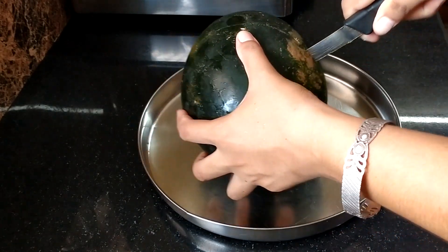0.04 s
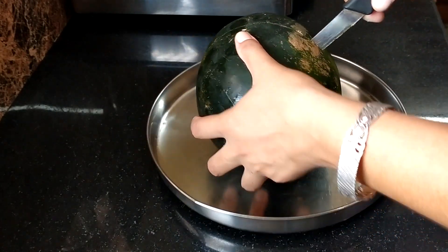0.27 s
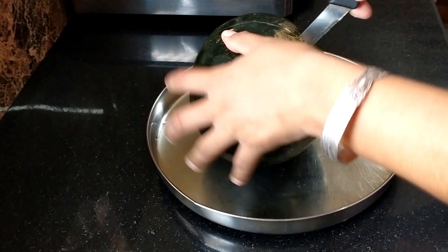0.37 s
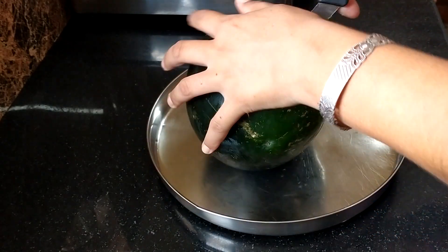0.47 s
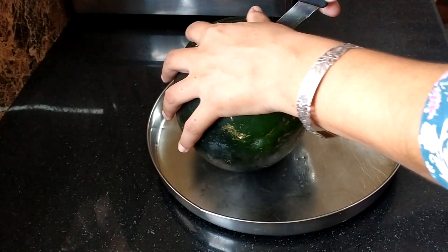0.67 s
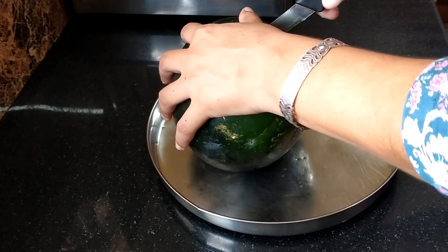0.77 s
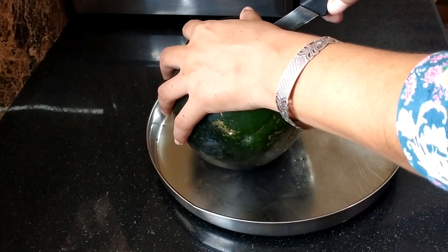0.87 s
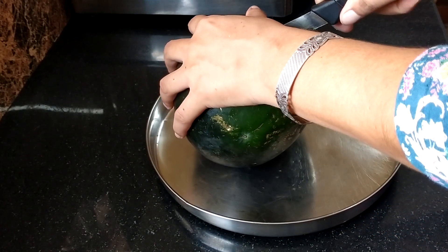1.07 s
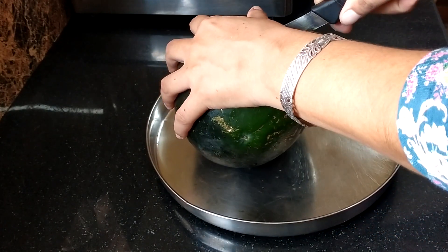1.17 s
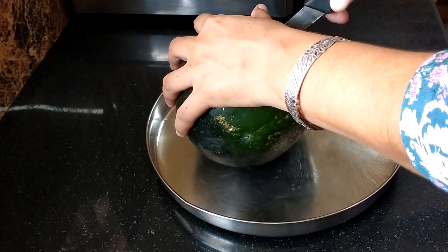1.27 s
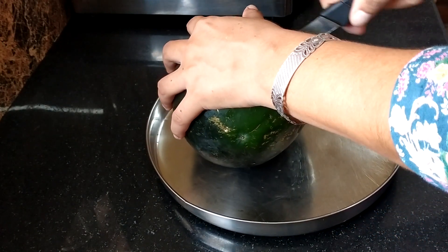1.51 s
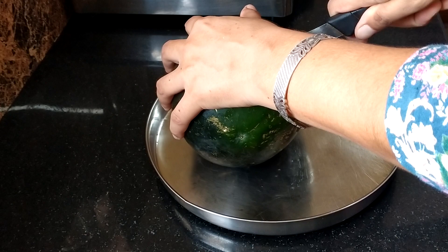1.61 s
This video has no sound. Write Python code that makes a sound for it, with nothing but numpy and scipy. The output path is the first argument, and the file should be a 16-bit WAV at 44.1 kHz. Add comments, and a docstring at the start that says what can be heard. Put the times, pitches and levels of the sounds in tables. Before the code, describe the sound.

Close by, a metal tray gives a quick run of ringing knocks under a turning watermelon. The melon settles with a dull thud and small ticks, over a faint hum in a hard, echoing kitchen.

```python
"""Watermelon in a steel tray

A watermelon is rolled over in a round steel tray on a stone counter, in a hard, echoing kitchen.
The tray tips and clatters, knocks once more with a thin ring of a knife blade, then ticks as the
melon settles. The rind murmurs and squeaks on the steel, the melon's weight thuds, and at the end
something rubs on the rind. A low, wavering drone fills the room throughout."""
import sys
import numpy as np
from scipy import signal
from scipy.fft import rfft, irfft
from scipy.io import wavfile
from scipy.ndimage import uniform_filter1d

SR = 44100
rng = np.random.default_rng(int(sys.argv[2]) if len(sys.argv) > 2 else 0)


def to_wav(s):
    """Save 16-bit WAV."""
    ch = np.atleast_2d(s).T  # columns
    pcm = np.round(np.clip(ch, -1, 1) * 32767)  # PCM
    wavfile.write(sys.argv[1], SR, pcm.astype(np.int16))


N = 72765
T = np.arange(N) / SR


# knocks of the tray under the melon (time [s], relative level [dB], treble [dB], chatter length [s])
TRAY_KNOCKS = [(.131, -29.5, -10, 0.007), (.1955, -22.5, 7, 0.0042), (.2395, -3, 4.5, .008),
               (.2565, -2.5, 2, 0.0093), (.279, -1, -4.5, .01), (.3825, -2.5, -6.5, .01),
               (.397, -5, -26, .012), (.465, -13, -8.5, .01), (.563, -20.5, 6.5, .008)]
# light ticks of rind and knife on the steel (time [s], relative level [dB], treble [dB])
STEEL_TICKS = [(0.1414, -32.5, 2), (0.4898, -26.5, 4.5), (.6466, -28, 14), (.6945, -32, 1),
               (0.7722, -27, -3), (0.8054, -24.5, 4.5), (1.0261, -40, 8), (1.0549, -32, 2),
               (1.2227, -36, -1), (1.2567, -39, -1), (1.3305, -46.5, 18), (1.5101, -50, 15),
               (1.528, -50, 16), (1.56, -42.5, 12)]
# pitches of the tray's clear modes (frequency [Hz])
MODE_PITCHES = [1018, 1117, 1158, 1190, 1234, 1374, 1775, 1847, 2137, 2185, 2652, 3724, 4037, 4946]
# how those modes ring, in the same order (relative level [dB], t60 [s])
MODE_RINGS = [(-3.5, 1.05), (2, 0.36), (-5, 1.15), (1.5, 0.6), (-1.5, 1.12), (-12, 2.02), (-6, 1.3),
              (0.5, 1.05), (-6, 0.48), (-9.5, 1.62), (-9, .6), (-7.5, 0.41), (-10.5, .7), (-11.5, 0.31)]

def tray(level_db=7, modes_db=-6, tick_chatter_s=.003):
    """Every knock and tick sets off a dense clang and feeds the steel's clear modes."""
    contacts = TRAY_KNOCKS + [(*tick, tick_chatter_s) for tick in STEEL_TICKS]
    pushes = sum(contact(*row) for row in contacts)
    clang = signal.fftconvolve(pushes, clang_response())[:N]
    touches = np.zeros(N)
    for start, db, _, length in contacts:
        touching = (T >= start) & (T < start + length)
        touches += undb(db) * unit_energy(1. * touching)
    modes = sum(undb(db) * ring(touches, hz, t60) for hz, (db, t60) in zip(MODE_PITCHES, MODE_RINGS))
    modes = unit_energy(modes) * np.linalg.norm(touches)
    return undb(level_db) * (clang + undb(modes_db) * modes)


def contact(start, db, treble_db, length, bounces=24, chatter_db=4):
    """A first hit followed by a quick chatter of small bounces."""
    push = signal.unit_impulse(N, int(start * SR))
    times = start + rng.random(bounces) * length
    sizes = undb(chatter_db) * unit_energy(rng.standard_normal(bounces))
    np.add.at(push, (times * SR).astype(int), sizes)
    return undb(db) * shelf(unit_energy(push), treble_db)


def ring(touches, hz, t60, beat_db=4.5):
    """One beating mode: every touch adds energy, which then leaks away."""
    retained = np.exp(-2 * np.log(1000) / (t60 * SR))
    energy = signal.lfilter([1], [1, -retained], touches ** 2)
    beating = undb(beat_db * walk(25.65))
    return np.sqrt(energy) * beating * np.sin(2 * np.pi * (hz * T + rng.random()))


# broad resonances of the tray's floor, damped by the melon (frequency [Hz], width [Hz], boost [dB])
FLOOR_RESONANCES = [(1158, 120, 6.5), (1865, 37, 9.5), (2678, 49, 7), (3730, 48, 6.5)]
# EQ of a knock and its echo (frequency [Hz], relative level [dB])
KNOCK_EQ = [(60, -13), (130, -29), (300, -15), (420, -19), (490, -7), (620, -10), (760, -7), (1180, -5),
            (1550, -7), (2100, -2), (2800, -7.5), (3500, -13), (5700, -19), (8000, -16), (9600, -24.5),
            (15500, -20.5)]

def clang_response(crack_db=-5, clang_db=-3, room_db=-2):
    """The answer to one push: a crack and a short, dense clang, then the kitchen's tail."""
    crack = unit_energy(rng.standard_normal(N) * fade(t60=.008))
    body = unit_energy(rng.standard_normal(N) * fade(t60=.09))
    clang = resonate(body + undb(crack_db) * crack, FLOOR_RESONANCES)
    tail = shelf(kitchen_tail(), treble_db=-3.5)
    return colour(undb(clang_db) * clang + undb(room_db) * tail, KNOCK_EQ)


# reverb time of the kitchen (frequency [Hz], t60 [s])
KITCHEN_DECAY = [(150, 1.16), (1000, 1.023), (2500, 0.93), (6000, 0.82), (15000, 0.51)]

def kitchen_tail(build_s=.0091):
    """Echoes off hard walls build into a wash whose treble dies first."""
    hz = np.fft.rfftfreq(N, 1 / SR)
    spectrum = rfft(rng.standard_normal(N))
    edges_hz = np.geomspace(40, SR / 2, 16)
    tail = np.zeros(N)
    for low, high in zip(edges_hz, edges_hz[1:]):
        band = irfft(spectrum * ((hz >= low) & (hz < high)), N)
        tail += band * fade(on_log_axis(np.sqrt(low * high), KITCHEN_DECAY))
    return unit_energy(tail * (1 - np.exp(-T / build_s)))


# modes of the knife blade (frequency [Hz], level [dB], t60 [s])
BLADE_MODES = [(6280, -46, 0.34), (8080, -49, 0.59), (15150, -45, .25)]

def blade(start_s=.387):
    """The knife blade rings thin and high as the tray knocks back."""
    touch = signal.unit_impulse(N, int(start_s * SR))
    return sum(undb(db) * ring(touch, hz, t60) for hz, db, t60 in BLADE_MODES)


# fader curve of the roll (time [s], level [dB])
ROLL_LEVEL = [(0, -52.5), (.11, -62), (.19, -52.5), (.232, -38), (.3, -41.5), (.45, -44), (.62, -50),
              (.9, -60), (1.08, -58), (1.4, -66), (1.65, -71)]
# EQ of rind rolling on steel (frequency [Hz], relative level [dB])
ROLL_EQ = [(200, 1.5), (500, -9), (900, -2), (1300, 1), (2100, 1), (3500, -10), (8000, -22), (15000, -30.5)]

def rolling(grain_db=2.5):
    """Tiny slips of the rind make a grainy murmur in the steel."""
    slips = rng.standard_normal(N) * undb(grain_db * rng.exponential(size=N))
    return unit(colour(slips, ROLL_EQ)) * fader(ROLL_LEVEL)


# dull thuds under the clatter (time [s], level [dB])
MELON_THUDS = [(0.274, -45), (.568, -32), (0.624, -38)]

def thuds(hz=100.5, t60=.19):
    """The melon's weight lands on the counter, each time a low, damped tone."""
    sound = np.zeros(N)
    for start, db in MELON_THUDS:
        age = np.maximum(T - start, 0)
        sound += undb(db) * np.sin(2 * np.pi * hz * age) * np.exp(-np.log(1000) * age / t60)
    return sound


# faint squeaks of the rind (peak time [s], half-width [s], level [dB])
RIND_SQUEAKS = [(0.443, 0.07, -42.5), (1.042, 0.022, -59), (1.144, 0.0055, -53.5), (1.234, 0.038, -61.5)]

def squeaks():
    """The rind sticks and slips on the steel in short swells of one unsteady tone."""
    swells = sum(undb(db) * np.exp(-((T - peak) / width) ** 2) for peak, width, db in RIND_SQUEAKS)
    return tone(hz=873, waver=.0202, rate_hz=120) * swells


# EQ of the rub (frequency [Hz], relative level [dB])
RUB_EQ = [(400, -8), (1000, -6), (1500, 0), (2300, 4), (3200, -8.5), (5000, -7.5), (10000, -9.5),
          (13000, -1.5), (15200, 1.5)]

def rub(start_s=1.553, level_db=-47.5, grain_db=1.5, flutter_db=1.2):
    """Friction on the rind gives a short, bright, grainy hiss."""
    attack_s, release_after_s, release_s = .018, .05, .07
    age = np.maximum(T - start_s, 0)
    attack = np.minimum(age / attack_s, 1)
    release = np.exp(-np.maximum(age - release_after_s, 0) / release_s)
    grains = rng.standard_normal(N) * undb(grain_db * rng.exponential(size=N) + flutter_db * walk(150))
    return undb(level_db) * attack * release * unit(colour(grains, RUB_EQ))


# fader curve of the drone's low tone (time [s], relative level [dB])
DRONE_LEVEL = [(0.0, -50), (0.202, -44.5), (0.326, -63), (0.352, -46), (0.398, -59), (0.49, -42),
               (0.542, -49), (0.588, -41.5), (0.628, -48.5), (0.79, -48), (0.818, -53.5), (0.992, -37.5),
               (1.034, -48), (1.102, -39.5), (1.42, -42.5), (1.538, -52.5), (1.59, -40.5), (1.65, -70)]
# faint tones above it (frequency [Hz], relative level [dB])
DRONE_OVERTONES = [(103, -58), (143, -59.5), (181, -66.5), (211, -62)]
# EQ of the room's rumble and air (frequency [Hz], relative level [dB])
AIR_EQ = [(18, -6), (32, -19), (45, -6.5), (70, -1.5), (105, -1.5), (160, -21), (240, -13.5), (400, -29.5),
          (870, -25.5), (1200, -34), (2400, -35), (4500, -41.5), (8000, -45), (11000, -52), (16000, -44)]
# gentle swell of the overtones and the air together (time [s], gain [dB])
ROOM_SWELL = [(0, -7.5), (.3, 1.5), (.65, -1), (.85, 0), (1.2, -1), (1.65, 0.5)]

def drone(low_hz=65, waver=.0242, low_trim_db=1.5, flicker_db=1.68, air_db=-47.5):
    """A wavering low tone with faint overtones, over the room's rumble and air."""
    low = tone(low_hz, waver, rate_hz=22.2) * undb(low_trim_db) * fader(DRONE_LEVEL)
    overtones = sum(tone(hz, waver, rate_hz=22.09) * undb(db + flicker_db * walk(9.2))
                    for hz, db in DRONE_OVERTONES)
    air = undb(air_db) * unit(colour(rng.standard_normal(N), AIR_EQ))
    return low + (overtones + air) * fader(ROOM_SWELL)


def tone(hz, waver, rate_hz):
    """A sine of rms 1 whose pitch wanders by about the fraction `waver`."""
    pitch = hz * (1 + waver * walk(rate_hz))
    return np.sqrt(2) * np.sin(2 * np.pi * np.cumsum(pitch) / SR)


def walk(rate_hz):
    """Smooth random drift of rms 1."""
    hold = int(SR / rate_hz)
    steps = np.repeat(rng.standard_normal(N // hold + 1), hold)
    return unit(uniform_filter1d(uniform_filter1d(steps, hold), hold)[:N])


def fade(t60):
    """Exponential decay, 60 dB down after t60 seconds."""
    return np.exp(-np.log(1000) * T / t60)


def fader(points):
    """Gain curve through (time [s], level [dB]) points."""
    return undb(np.interp(T, *np.array(points).T))


def resonate(x, peaks):
    """Add resonant boosts that ring briefly."""
    return x + sum((undb(db) - 1) * signal.lfilter(*signal.iirpeak(hz, hz / width, fs=SR), x)
                   for hz, width, db in peaks)


def shelf(x, treble_db, corner_hz=4200):
    """Raise or lower the treble."""
    hz = np.fft.rfftfreq(2 * N, 1 / SR)
    gain = undb(treble_db * hz ** 2 / (hz ** 2 + corner_hz ** 2))
    return irfft(rfft(x, 2 * N) * gain)[:N]


def colour(x, points, taps=4096):
    """Minimum-phase EQ of unit energy, shaped by (frequency [Hz], relative level [dB]) points."""
    gain = undb(on_log_axis(np.fft.rfftfreq(taps, 1 / SR), points))
    cepstrum = irfft(np.log(gain))
    cepstrum[1:taps // 2] *= 2  # folded forward, so nothing rings ahead of a hit
    cepstrum[taps // 2 + 1:] = 0
    response = irfft(np.exp(rfft(cepstrum)))
    return signal.fftconvolve(x, unit_energy(response))[:N]


def on_log_axis(hz, points):
    """Read a table over log frequency."""
    frequencies, values = np.array(points, float).T
    return np.interp(np.log(np.maximum(hz, 1)), np.log(frequencies), values)


def undb(db):
    """Decibels to gain."""
    return 10 ** (np.asarray(db) / 20)


def unit(x):
    """Scale to rms 1."""
    return x / np.sqrt(np.mean(x ** 2))


def unit_energy(x):
    """Scale to energy 1."""
    return x / np.sqrt(np.sum(x ** 2))


def scene():
    """Mono mix: the tray up front, the melon's small sounds under it, the drone behind."""
    return (tray() + blade() + rolling() + thuds() + squeaks() + rub() + drone())[None]


def record(dry):
    """A steep low-pass takes off the very top."""
    top_hz = 15850
    return signal.sosfilt(signal.ellip(10, .2, 80, top_hz, fs=SR, output="sos"), dry)


dry = scene()
out = record(dry)
to_wav(out)
```